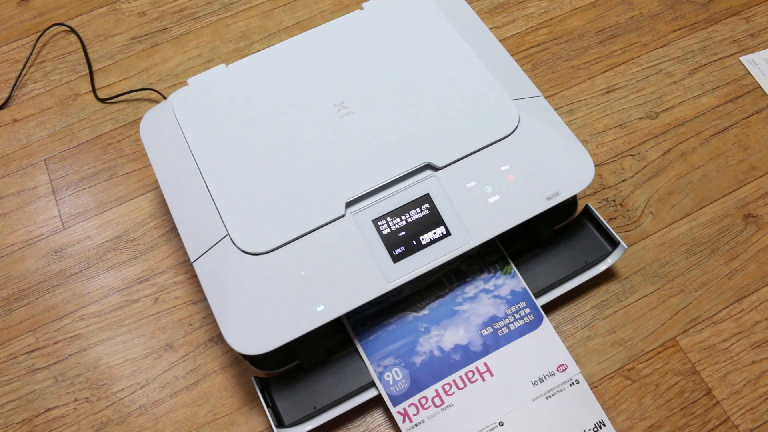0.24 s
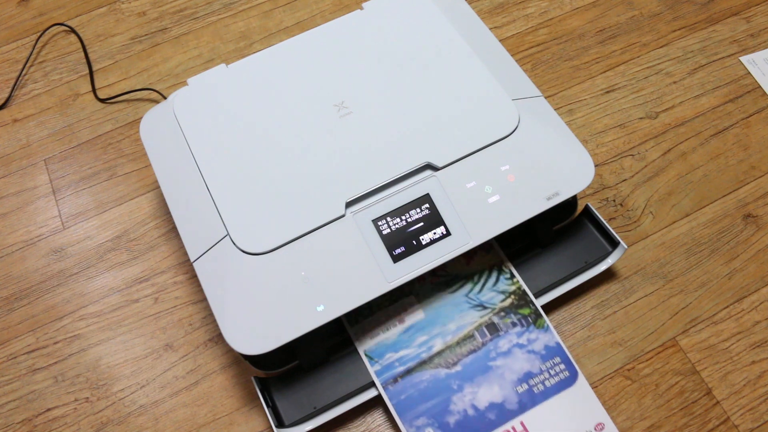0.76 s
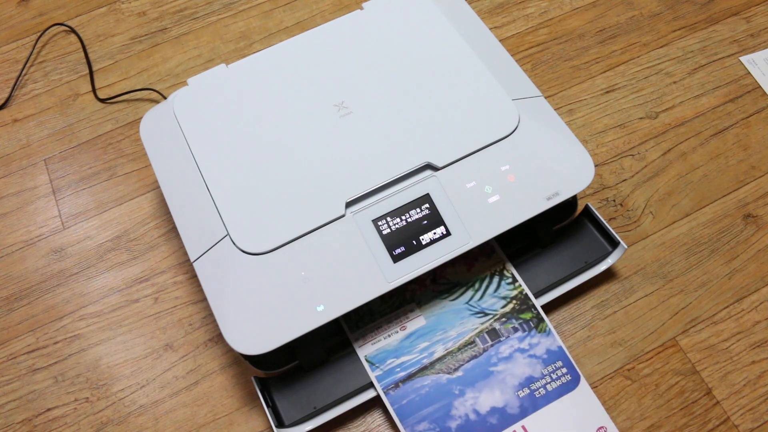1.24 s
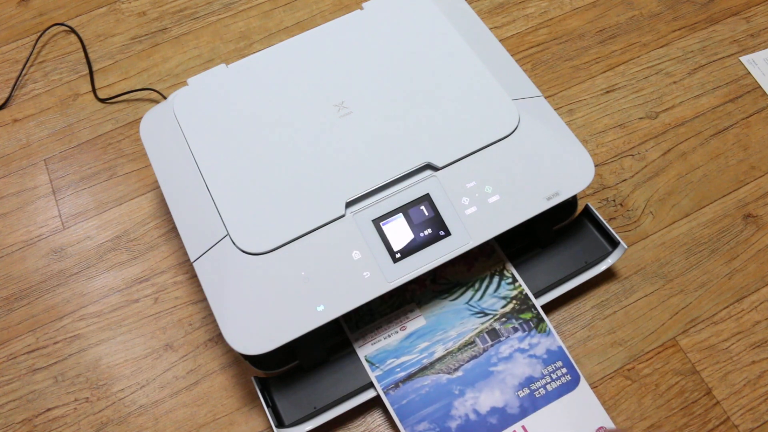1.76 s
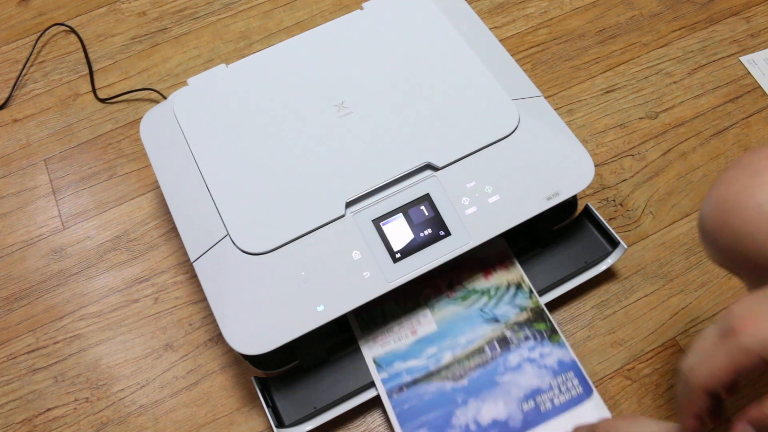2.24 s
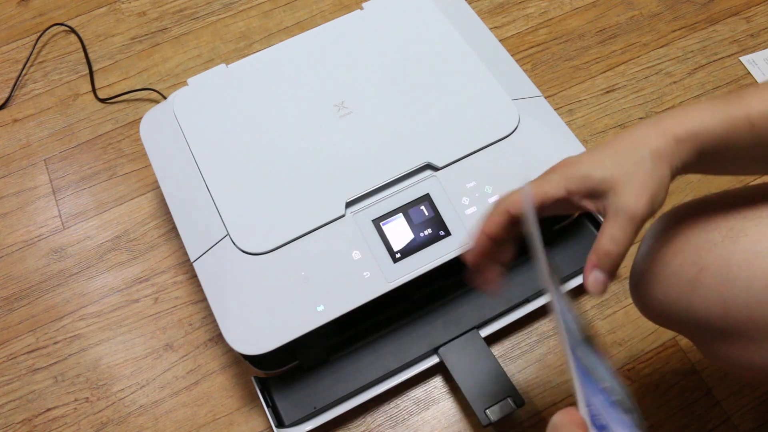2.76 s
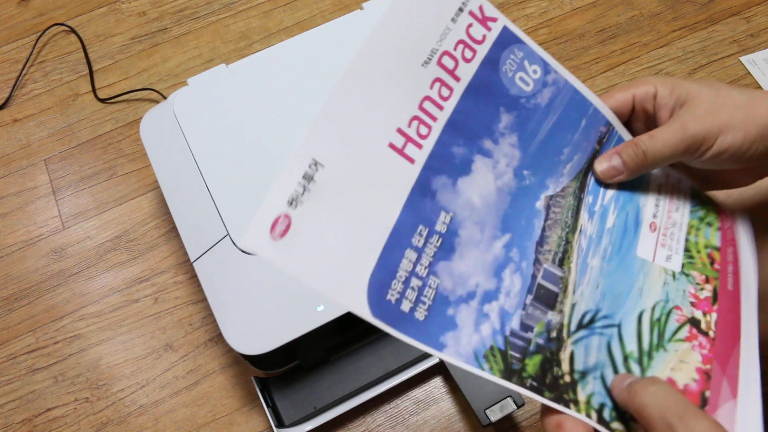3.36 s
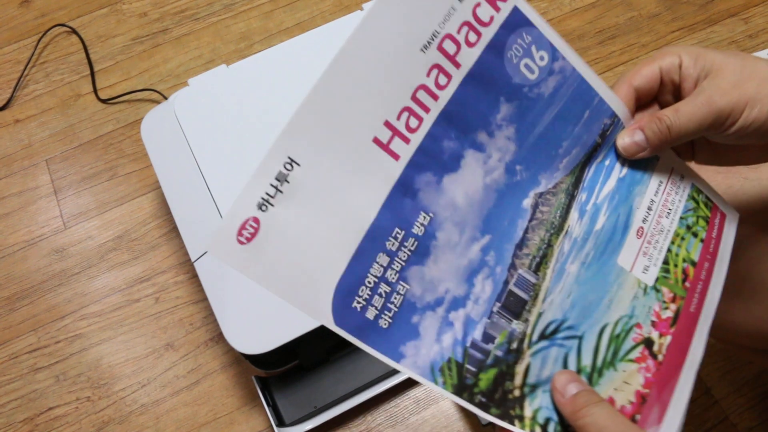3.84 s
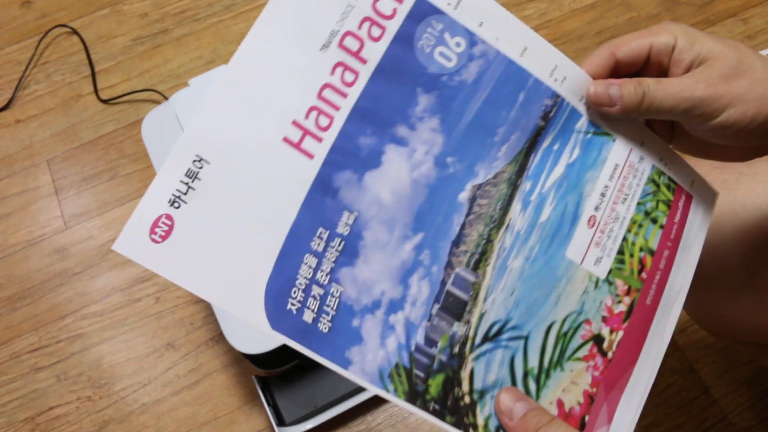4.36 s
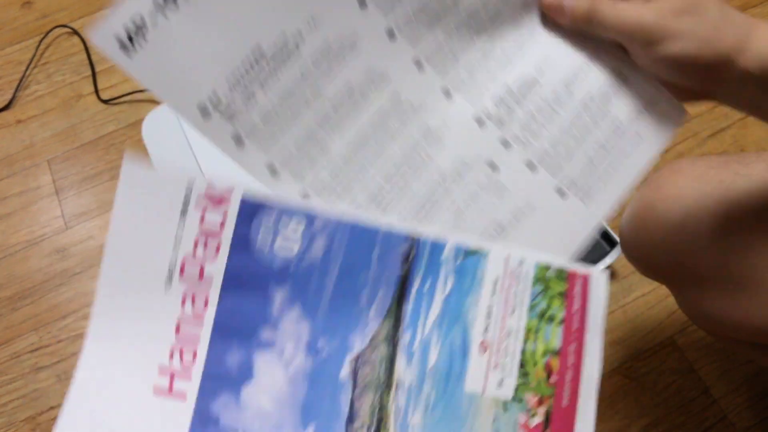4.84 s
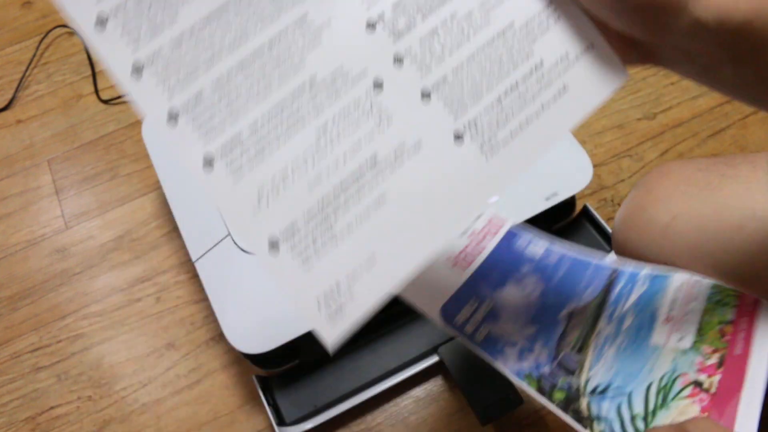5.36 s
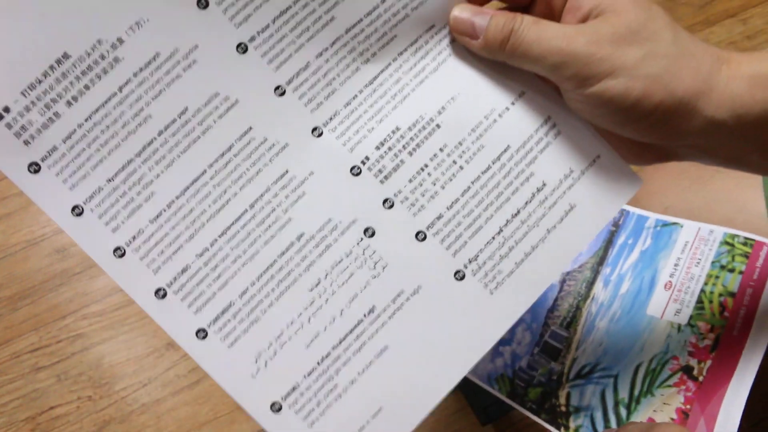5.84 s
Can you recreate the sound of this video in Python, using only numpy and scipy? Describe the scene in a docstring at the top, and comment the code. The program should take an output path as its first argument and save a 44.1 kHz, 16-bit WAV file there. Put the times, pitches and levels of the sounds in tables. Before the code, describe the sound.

A printer briefly whirs and snaps sharply, then paper rustles, slides and crackles close by in a small humming room.

```python
"""A small bare room with a wooden floor and a steady appliance hum, heard on a stereo camera.
An inkjet printer on the floor throws out its last sheet: the gears whirr, the motor whines, a latch snaps.
Close to the microphones, hands pull the sheet from the tray, slide it over a second one and flex both.
The paper hisses as its fibres slip and cracks as it buckles; knees and feet thud on the boards."""
import sys
import numpy as np
from scipy import signal
from scipy.fft import rfft, irfft, next_fast_len
from scipy.io import wavfile
from scipy.ndimage import uniform_filter1d

SR = 44100
rng = np.random.default_rng(int(sys.argv[2]) if len(sys.argv) > 2 else 0)


def unload_audio(sound):
    """Save the sound as a 16-bit wav file, at the path given as the first command line argument."""
    columns = np.transpose(np.atleast_2d(sound))
    # keep every value between -1 and 1, then stretch to whole-number steps
    steps = np.round(np.clip(columns, -1, 1) * 32767)
    wavfile.write(sys.argv[1], SR, steps.astype(np.int16))


N = 268569

# Moves of the sheets, by rollers and by hands close to the camera. Each row: time of full strength,
# rise, hold and fall in seconds, then flexing, rubbing and fine hiss in relative dB.
STROKES = [(0.012, 0.18, 0.077, 0.053, -38.5, -48, -51), (0.154, 0.032, .005, 0.05, -42, -56, -47),
           (0.258, .3, 0.19, 0.21, -46.5, -52.5, -51), (0.544, .04, .002, 0.023, -41.5, -64, -69),
           (0.645, .04, .14, 0.091, -32.5, -35, -49.5), (0.713, 0.24, 0.015, 0.18, -39, -41, -47),
           (0.936, 0.07, 0.0046, 0.13, -49.5, -54, -52), (1.059, 0.052, 0.063, 0.044, -38.5, -45, -51),
           (1.225, 0.11, 0.0041, 0.039, -41.5, -49, -44), (1.267, 0.022, 0.011, .07, -50, -41, -41),
           (1.429, 0.34, .008, 0.09, -36.5, -41.5, -58), (1.52, 0.14, 0.19, 0.44, -49, -55, -55),
           (1.948, 0.035, .005, 0.11, -52.5, -60, -70), (2.003, .03, .07, .15, -72, -63, -61),
           (2.124, 0.017, .002, .02, -55, -71, -71.5), (2.19, 0.12, 0.028, .03, -51.5, -54, -65),
           (2.244, 0.021, 0.007, 0.047, -38, -51, -45.5), (2.304, 0.022, 0.0086, 0.12, -32.5, -38, -49),
           (2.403, 0.13, 0.062, 0.092, -59, -46, -36), (2.55, 0.054, 0.025, 0.13, -44, -44.5, -53),
           (2.725, 0.28, .005, 0.19, -64, -59.5, -54.5), (2.853, .01, .003, 0.091, -48, -45, -51),
           (2.917, .02, .07, .04, -41, -53, -54), (3.065, 0.075, .01, 0.036, -52, -50, -56),
           (3.099, 0.025, .012, 0.063, -51, -64, -49), (3.194, 0.0036, 0.019, .07, -37.5, -53, -39),
           (3.308, 0.032, 0.0044, 0.045, -60, -41.5, -46), (3.416, .04, .003, 0.041, -32, -52, -63),
           (3.447, 0.043, .003, 0.036, -57, -52, -46.5), (3.488, .01, .003, 0.14, -43.5, -46, -55.5),
           (3.63, 0.072, .003, 0.035, -64, -59, -60), (3.689, .05, 0.048, 0.027, -53, -59, -66),
           (3.77, 0.067, .09, 0.12, -56, -50.5, -52.5), (3.899, 0.02, .005, 0.12, -59, -47, -45),
           (4.042, 0.1, 0.019, 0.097, -57, -44.5, -51), (4.241, .05, .003, 0.039, -46, -59, -72),
           (4.28, 0.077, 0.0044, 0.036, -63, -66, -64), (4.479, 0.36, 0.29, 0.19, -55, -50, -44.5),
           (4.809, .015, .02, 0.044, -52, -48.5, -53), (4.896, 0.025, 0.056, .05, -55.5, -45.5, -52),
           (4.975, 0.014, 0.0026, 0.012, -36, -42, -56), (5.009, .04, .11, 0.014, -56, -43.5, -44.5),
           (5.128, 0.05, .003, 0.049, -35.5, -60, -62), (5.368, .03, 0.0027, 0.025, -40, -67, -75),
           (5.402, 0.039, 0.062, .05, -48.5, -44.5, -53.5), (5.481, .02, .003, 0.073, -44.5, -44.5, -62),
           (5.685, .06, .005, 0.16, -55, -66, -78)]
# The paper's tone up close: flexing, rubbing, fine hiss and the airy top of a fast rub.
# Each row: frequency in Hz, spectral density in relative dB.
FLEX_SPECTRUM = [(40, -60), (110, -43), (200, -2), (300, 2), (550, -1), (1000, -0.5), (1500, -5.5),
                 (2300, -9), (4000, -36)]
RUB_SPECTRUM = [(700, -8), (1200, 0), (1700, 2), (3100, 2.5), (4300, -3.5), (5500, -7.5), (7200, -19.5),
                (12000, -64)]
HISS_SPECTRUM = [(2650, -17), (4500, -4.5), (5510, -4.5), (7030, -2), (10900, -6), (15200, -21.5),
                 (16000, -25)]
FAST_RUB_SPECTRUM = [(7000, -33), (10500, -31), (13000, 9), (16000, 6.5)]
# Edges singing as they slide over the other sheet. Each row: time of full strength, rise, hold and
# fall in seconds, level in dB, band centre in Hz.
EDGE_SLIDES = [(3.897, 0.018, .03, 0.073, -60, 8160), (4.023, 0.042, 0.035, 0.045, -56, 3030),
               (4.034, 0.035, .04, .05, -64, 6300), (4.03, 0.035, .04, .05, -59, 8050),
               (4.26, 0.053, 0.038, 0.12, -60.5, 4300), (4.285, 0.062, 0.017, 0.035, -62, 10500),
               (4.503, 0.081, 0.093, 0.16, -61, 7150), (4.505, 0.092, .25, 0.25, -72, 10300),
               (4.763, 0.4, 0.074, .2, -54.5, 4320), (4.994, 0.034, 0.092, .03, -59, 8600),
               (5.05, .1, 0.057, .03, -52.5, 10600), (5.059, 0.027, .003, 0.047, -47, 4300),
               (5.47, .1, 0.025, 0.061, -50, 1510)]
# An edge's narrow band. Each row: frequency as a multiple of the centre, density in relative dB.
EDGE_BAND = [(.77, -23), (.93, -7), (1, 3), (1.07, -5), (1.28, -31)]


def paper():
    """The sheet flexes with a dull crumple and rubs with a grainy hiss, brighter on strong strokes."""
    strokes, edges = np.transpose(STROKES), np.transpose(EDGE_SLIDES)
    flex_gain, rub_gain, hiss_gain = undb(strokes[4:]) @ swells(*strokes[:4])
    slips = fibre_slips(scatter_db=0.5, flicker_db=1.03, flicker_hz=76)
    crumple = fibre_slips(scatter_db=3.0, flicker_db=2.5, flicker_hz=70)
    flex = level(colour(crumple, FLEX_SPECTRUM), -5) * flex_gain
    rub = level(colour(slips, RUB_SPECTRUM), -4.5) * rub_gain
    hiss = level(colour(slips, HISS_SPECTRUM), 0.21) * hiss_gain
    airy_top = level(colour(slips, FAST_RUB_SPECTRUM), 19.2) * hiss_gain ** 1.92
    singing = sum(level(colour(slips, np.multiply(EDGE_BAND, [hz, 1])), db) * swell
                  for db, hz, swell in zip(*edges[4:], swells(*edges[:4])))
    return flex + rub + hiss + airy_top + singing


# A sheet is wide, so each microphone hears other fibres.
# Each row: frequency in Hz, left-right correlation.
SHEET_CORRELATION = [(100, 1), (1000, 1), (2500, 1), (6000, 0.3), (16000, 0.038)]


def fibre_slips(scatter_db, flicker_db, flicker_hz):
    """Dense fibre slips, four samples each, of uneven but bounded size; their strength flickers."""
    size_db = scatter_db * np.minimum(rng.exponential(size=N // 4 + 1), 6)
    return diffuse(N, SHEET_CORRELATION) * undb(np.repeat(size_db, 4)[:N] + flicker_db * walk(flicker_hz))


# Latches clicking and paper buckling near the camera. Each row: start in seconds, ring peak in dB,
# ring pitch in Hz, crack peak in dB, crack band in Hz, ring time to -60 dB in ms, nominal crackle
# length in ms, lag at the left microphone in microseconds.
SNAPS = [(0.0207, -29.5, 1080, -30, 4260, 2.6, 2.8, 118), (0.5418, -28, 566, -47.5, 4300.0, 2.4, 1, 135),
         (0.6276, -24.5, 880, -52, 2400.0, 2, 8.5, 20.0), (1.0442, -42, 1240, -42, 3000.0, 1.6, 8.5, 97),
         (1.1889, -33, 1230, -26.5, 3320, 4.9, 2.2, 113), (1.2515, -6.5, 1840, -4, 2860, 3.2, 0.06, 100),
         (1.2514, -17, 5800, -17, 11000, 4.6, 0.12, 95), (1.2684, -25, 990, -21, 9000, 1.9, 0.22, 116),
         (1.2862, -35, 4000, -32, 11000, 1.5, 0.2, 100), (1.4135, -29, 780, -39, 3400.0, 3.9, 6, 52),
         (1.471, -27, 312, -32, 3430, 3.6, 0.75, 98), (1.7049, -35.5, 800, -53, 4030, 3.5, 0.81, 158),
         (2.1515, -45, 647, -30.5, 3300.0, 3, 0.46, 53), (2.2406, -25, 800, -21.5, 2270, 2.6, 1, 45),
         (2.302, -43, 680.0, -24, 2760, 3.6, 10, 41), (2.3657, -31, 585, -30, 3500.0, 5.5, 5.1, 13),
         (2.8513, -41.5, 1150, -39, 4330, 5.5, 4.1, 112), (2.9061, -42.5, 450, -36, 4400.0, 5.6, 14, 93),
         (2.9713, -28, 670.0, -41, 3420, 0.76, 2.2, 80), (3.0537, -47, 1280, -33, 3500.0, 3.3, 0.83, 57),
         (3.0747, -26.5, 1830, -21.5, 3850, 4.8, 1.9, 48), (3.0887, -35, 660, -39, 3720, 3.1, 1.8, 75),
         (3.194, -52, 1490, -39, 4500, 1.1, 3, 70), (3.2029, -25, 720, -19.5, 3840, 1, 1.1, 74),
         (3.2054, -20, 1510, -23, 2160, 2.1, 3.3, 59), (3.3036, -57, 650.0, -36, 4900.0, 2.7, 4.5, 50.0),
         (3.3994, -25.5, 674, -56, 2250, 0.96, 3.8, 47), (3.4045, -27.5, 284, -25, 2230, 7, 5.1, 38),
         (3.4889, -40.5, 640, -44, 3200.0, 2.2, 4, 20.0), (3.6866, -40, 400.0, -50, 3000.0, 5.2, 5.4, 70.0),
         (3.7598, -27, 630, -37, 4250, 1.7, 0.42, 52), (4.8064, -32, 890, -31.5, 5060, 4.7, 4.4, -37),
         (4.8753, -23.5, 730, -50, 2400, 2.1, 0.31, 52), (4.878, -20, 1610, -27, 2200, 1.4, 1.6, 52),
         (4.9718, -28, 940, -41, 2600.0, 2.6, 4.7, 52), (4.9995, -24, 830, -38, 3500.0, 7.6, 1, 47),
         (5.0914, -27, 1360, -33, 3160, 2.4, 4.7, 0.0), (5.1128, -37, 1370, -37, 4100.0, 1.5, 4.4, 41),
         (5.3298, -41.5, 507, -53, 4200.0, 3.7, 7.4, -20.0), (5.3601, -33.5, 365, -54, 2800.0, 27, 5.8, 53),
         (5.4127, -41.5, 466, -34.5, 3830, 3, 7.8, 50.0), (5.4747, -33, 1460, -36, 3640, 6.9, 9.3, 72),
         (5.483, -32, 1520, -39, 3000, 5.5, 1.6, 70)]


def snaps():
    """Each snap is a first crack and a run of others that ring the panel or sheet briefly."""
    out, size = np.zeros((2, N)), 2048
    t_ms = 1000 * np.arange(size) / SR
    for s, ring_db, ring_hz, crack_db, crack_hz, ring_ms, crackle_ms, lag_us in SNAPS:
        fade = np.exp(-(t_ms / max(1.8 * crackle_ms, .05)) ** 2)
        cracks = 0.13 * rng.standard_normal(size) ** 3 * fade  # cubing leaves a few big ones
        cracks[4] = -1  # the first crack
        # little is left below the ring's pitch
        below_ring_cut = signal.butter(2, ring_hz / 2, "highpass", fs=SR, output="sos")
        body = signal.sosfilt(below_ring_cut, ring(cracks, ring_hz, ring_ms / 1000))
        band = signal.butter(2, [.62 * crack_hz, 1.3 * crack_hz], "bandpass", fs=SR, output="sos")
        crack = signal.sosfilt(band, cracks) + 0.0066 * cracks
        snap = undb(ring_db) * body / np.abs(body).max() + undb(crack_db) * crack / np.abs(crack).max()
        start = int(s * SR)
        out[0, start:start + size] += delay(snap, lag_us / 1e6)
        out[1, start:start + size] += snap
    return out


# The printer, down on the floor, ejects the sheet.
# Each row: time in seconds, then gear train and motor whine in relative dB.
FEED_RUN = [(0.59, -47, -63), (0.608, -56, -67), (0.64, -30.5, -41), (0.67, -34.5, -29),
            (0.772, -28.5, -34.5), (0.818, -43.5, -60), (0.86, -51, -62)]
# The tones of its gear train. Each row: pitch in Hz, level in relative dB.
GEAR_TONES = [(264, -41.5), (311, -42), (527, -37.5), (633, -41.5), (762, -51), (808, -43), (852, -44.5),
              (941, -61), (995, -45), (1292, -45)]


def feed_motor(whine_hz=907):
    """Gear-mesh tones waver as the teeth load unevenly; the motor whines at one steady pitch."""
    t = np.arange(N) / SR
    s, gear_db, whine_db = np.transpose(FEED_RUN)
    gears = sum(undb(db + 3.3 * walk(29.84)) * np.sin(2 * np.pi * (hz * t + rng.random()))
                for hz, db in GEAR_TONES)
    whine = np.sin(2 * np.pi * whine_hz * t) * undb(1.3 * walk(44.0))
    return level(gears, -2.7) * gain_curve(s, gear_db) + level(whine, -0.65) * gain_curve(s, whine_db)


# Short ringing notes, some from the printer's tray.
# Each row: start in seconds, peak in dB, pitch in Hz, seconds to fall 60 dB.
PINGS = [(1.995, -32.5, 7030, 0.1), (2.305, -29.5, 513, 0.21), (2.307, -37.5, 296, 0.24),
         (2.307, -36.5, 400, 0.23), (4.1, -41.5, 675, 0.11), (4.973, -35.5, 1002, 0.14),
         (5.846, -42.5, 686, 0.12), (5.96, -48, 7460, 0.03)]


def pings(attack_s=0.0008):
    """Each note is a single fading mode with a soft start."""
    out, t = np.zeros(N), np.arange(SR // 2) / SR
    for s, db, hz, t60 in PINGS:
        note = undb(db - 60 * t / t60) * np.minimum(t / attack_s, 1) * np.sin(2 * np.pi * hz * t)
        start = int(s * SR)
        out[start:start + len(t)] += note[:N - start]
    return out


# Knees and feet shifting on the boards by the camera.
# Each row: time of the peak in seconds, level in relative dB.
FLOOR_THUDS = [(1.254, -45), (1.474, -55), (1.968, -41.5), (2.05, -43), (2.086, -38.5), (2.182, -42),
               (2.264, -44), (2.36, -50), (2.502, -39.5), (3.2, -58), (3.418, -57)]


def floorboards():
    """Dull thuds through the floor shake the camera, differently at the two microphones."""
    s, db = np.transpose(FLOOR_THUDS)
    shake = .6 * rng.standard_normal(N) + np.array([[.8], [1.3]]) * rng.standard_normal((2, N))
    rumble = level(colour(shake, [(15, -43), (35, 2.5), (90, 0.5), (140, -5), (250, -48.5)]), -3.0)
    return rumble * (undb(db) @ swells(s, rise_s=0.038, hold_s=0, fall_s=0.053))


# An appliance in the room hums, alike at both microphones.
# Each row: time in seconds, then the low and the upper pure line in relative dB.
HUM_LEVELS = [(0.0, -66, -62), (0.22, -61.5, -58), (0.49, -74, -58), (0.62, -75, -58.5), (1.32, -72, -54.5),
              (1.47, -62, -56), (2.3, -59, -60), (2.81, -70, -54.5), (2.97, -60, -57.5), (3.5, -69, -57),
              (3.87, -82, -56), (4.04, -71, -57.5), (4.8, -56.5, -56), (5.09, -79, -57.5),
              (5.24, -66, -57.5), (5.94, -62, -55.5), (6.09, -66, -59)]
# Its blurred lines. Each row: pitch in Hz, nominal width in Hz, level in dB.
DRONE_LINES = [(114.1, 9.1, -65.5), (156.2, 6, -58)]


def appliance_hum(pure_hz=(59.4, 178.1)):
    """Two pure lines waver in level; two more are blurred by drifting pitch and level."""
    t = np.arange(N) / SR
    s, *line_db = np.transpose(HUM_LEVELS)
    hum = sum(level(np.sin(2 * np.pi * hz * t), 0.086) * gain_curve(s, db)
              for hz, db in zip(pure_hz, line_db))
    for hz, width, db in DRONE_LINES:
        drift = 0.4 * width * np.cumsum(walk(4 * width)) / SR
        hum += level(np.sin(2 * np.pi * (hz * t + drift)) * undb(4.3 * walk(2 * width)), db)
    return hum


# Room tone all round the camera. Each row: frequency in Hz, spectral density in relative dB.
AIR_SPECTRUM = [(15, -21), (45, -22), (120, -4.5), (180, -6), (250, -5), (460, -11), (900, -15),
                (2000, -20), (5000, -22.5), (11000, -26.5), (16000, -31.5)]
# Diffuse sound at the microphone pair, alike in the bass and less so in the treble.
# Each row: frequency in Hz, left-right correlation.
ROOM_CORRELATION = [(30, 0.28), (80, 0.84), (400, 0.89), (1000, 0.74), (2500, 0.065), (16000, 0.027)]


def room_air():
    """Faint diffuse noise whose level wavers slightly."""
    air = colour(diffuse(N, ROOM_CORRELATION), AIR_SPECTRUM)
    return level(air, -54.5) * undb(0.91 * walk(6.7))


# The bare room's decay. Each row: frequency in Hz, seconds to fall 60 dB.
ROOM_DECAY = [(100, .5), (1000, .45), (4000, .38), (16000, .2)]
# The tone of its echo at the camera. Each row: frequency in Hz, gain in dB.
ECHO_COLOUR = [(100, -5), (1000, -4), (3000, -4), (6000, -10), (16000, -16)]


def echo_tail(gap_s=.0025):
    """Octave bands of diffuse echo, each dying at its own rate, after a short gap."""
    t, noise, tail = np.arange(SR // 2) / SR, diffuse(SR // 2, ROOM_CORRELATION), 0
    room_hz, room_t60 = np.transpose(ROOM_DECAY)
    for hz in 62.5 * 2. ** np.arange(9):
        band = colour(noise, [(hz / 2, -40), (hz / 1.5, -6), (hz, 0), (hz * 1.33, -6), (hz * 2, -40)])
        t60 = np.interp(np.log(hz), np.log(room_hz), room_t60)
        tail = tail + band * undb(-60 * t / t60)
    tail = tail * np.clip(t / gap_s - 1, 0, 1)
    return colour(tail / np.sqrt(np.sum(tail ** 2) / 2), ECHO_COLOUR)


def room_echoes(x, patterns=3, changes_per_s=25):
    """Sound leaves ever other spots on sheet and printer, so it fades between patterns of echoes."""
    turn = np.arange(N) / SR * changes_per_s % patterns
    out = 0
    for k in range(patterns):
        offset = np.abs((turn - k + patterns / 2) % patterns - patterns / 2)
        share = np.cos(np.pi / 2 * np.minimum(offset, 1)) ** 2
        out = out + signal.fftconvolve((x * share)[None], echo_tail(), axes=1)[:, :N]
    return out


def undb(db):
    """Decibels to amplitude."""
    return 10 ** (np.asarray(db) / 20)


def level(x, db):
    """Scale to an rms level."""
    return x * undb(db) / np.sqrt(np.mean(x ** 2))


def over_hz(table, size):
    """A (Hz, value) table read at the bins of a transform."""
    hz, value = np.transpose(table)
    return np.interp(np.log(np.fft.rfftfreq(size, 1 / SR) + 1), np.log(hz), value)


def colour(x, table):
    """Shape the spectrum by (Hz, dB) points."""
    size = next_fast_len(x.shape[-1])
    return irfft(rfft(x, size) * undb(over_hz(table, size)), size)[..., :x.shape[-1]]


def gain_curve(s, db):
    """Gain over time, silent outside the given points."""
    return undb(np.interp(np.arange(N) / SR, s, db, left=-200, right=-200))


def swells(s, rise_s, hold_s, fall_s):
    """One gain shape per event: up 20 dB per rise time until s, a hold, then down 20 dB per fall time."""
    t = np.arange(N) / SR
    s, rise_s, hold_s, fall_s = (np.reshape(v, (-1, 1)) for v in (s, rise_s, hold_s, fall_s))
    ramps_away = np.maximum((s - t) / rise_s, (t - s - hold_s) / fall_s)
    return undb(-20 * np.maximum(ramps_away, 0))


def walk(rate):
    """Random levels held 1 / rate s and slewed; spread near 1."""
    hold = int(SR / rate)
    return 1.31 * uniform_filter1d(np.repeat(rng.standard_normal(N // hold + 1), hold), hold)[:N]


def ring(x, hz, t60):
    """One decaying mode, driven by x."""
    pole = np.exp(2j * np.pi * hz / SR - np.log(1000) / (t60 * SR))
    return signal.lfilter([1], [1, -pole], x).imag


def diffuse(length, correlation):
    """Left and right noise, as alike as the (Hz, correlation) points say."""
    size = next_fast_len(length)
    alike = np.clip(over_hz(correlation, size), 0, 1)
    mid, side = rfft(rng.standard_normal((2, size)))
    mid, side = mid * np.sqrt(1 + alike), side * np.sqrt(1 - alike)
    return irfft(np.array([mid + side, mid - side]), size)[:, :length]


def delay(x, seconds):
    """Shift by a fraction of a sample or more."""
    size = next_fast_len(len(x))
    phase_shift = np.exp(-2j * np.pi * np.fft.rfftfreq(size, 1 / SR) * seconds)
    return irfft(rfft(x, size) * phase_shift, size)[:len(x)]


# The camera body shades the left microphone. Each row: frequency in Hz, gain in dB.
LEFT_SHADE = [(300, .3), (1500, -1), (4000, -2.5), (16000, -2.5)]


def scene(left_lag_s=7e-5):
    """Printer and paper reach the left microphone a little later and duller; the room surrounds them."""
    hits, rustle, tones = snaps(), paper(), feed_motor() + pings()
    left = colour(hits[0] + delay(rustle[0] + tones, left_lag_s), LEFT_SHADE)
    right = hits[1] + rustle[1] + tones
    # the rustle, motor tones and pings have less echo than the snaps
    echoes = room_echoes(hits[1] + undb(-2.5) * rustle[1] + undb(-4.5) * tones)
    return np.array([left, right]) + echoes + floorboards() + appliance_hum() + room_air()


def record(dry):
    """The camera's input stage flattens the loudest peak and cuts the top above 15.8 kHz."""
    top_cut = signal.ellip(10, .2, 70, 15800, fs=SR, output="sos")
    return signal.sosfilt(top_cut, np.clip(dry, -.9, .9))


dry = scene()
out = record(dry)
unload_audio(out)
```